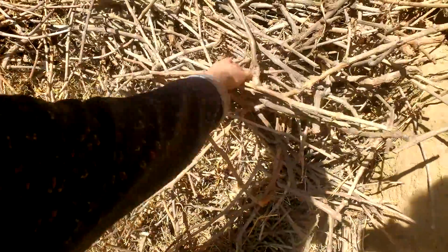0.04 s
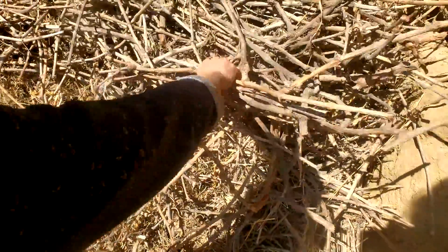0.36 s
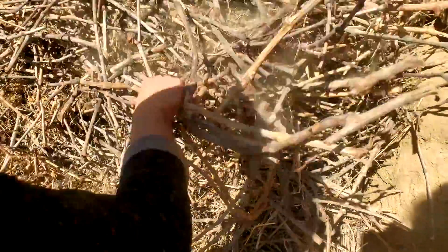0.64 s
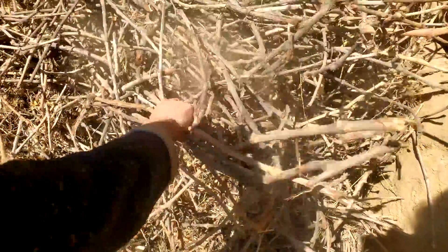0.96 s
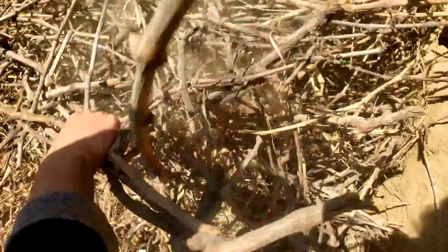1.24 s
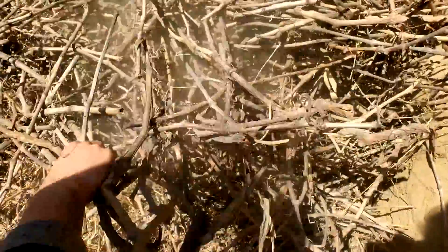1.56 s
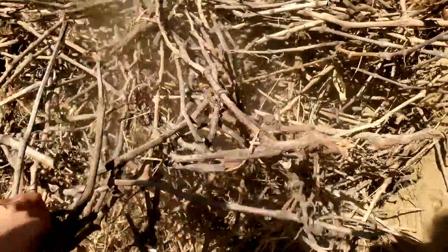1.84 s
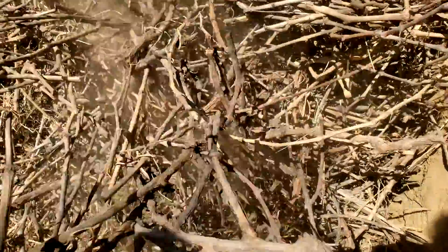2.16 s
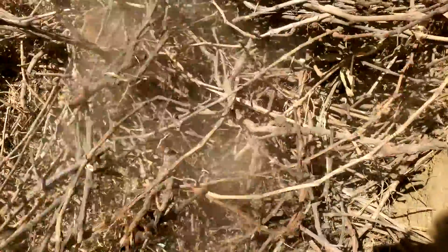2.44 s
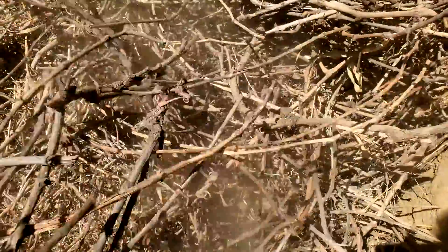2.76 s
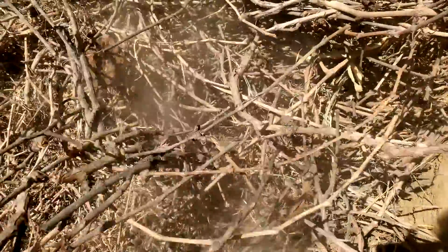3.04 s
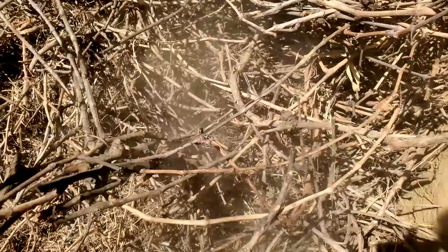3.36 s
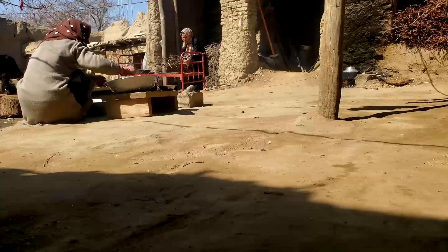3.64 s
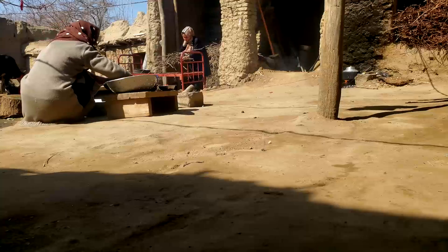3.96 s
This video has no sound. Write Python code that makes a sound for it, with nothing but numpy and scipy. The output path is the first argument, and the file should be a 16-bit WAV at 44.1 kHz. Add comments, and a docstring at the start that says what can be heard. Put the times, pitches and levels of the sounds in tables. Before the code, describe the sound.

Dry branches rustle and snap as they are pulled from a pile close by, slightly left. One clacks at 0.1 seconds, then four crackling pulls begin around 0.5, 1.1, 1.8 and 2.3 seconds, the last with a thick stick breaking loudly. Dull knocks on hollow wood come in runs further off. At about 3.5 seconds it cuts to a quiet yard with low rumble, faint buzz and one distant scrape.

```python
"""A walled yard, with a brush pile close by and a little left of the microphone.
A branch clacks in the hand, then dry branches are dragged out in four pulls: twigs rub and crackle,
sticks snap, and as the last pull begins a thick stick breaks loudly with a short woody ring. Meanwhile,
further off, hollow wood is pounded in runs of about four blows a second. Near the end the sound cuts
abruptly to a quieter yard: low rumble, faint hiss, a thin buzz on the right and one far scrape."""
import sys
import numpy as np
from scipy import signal
from scipy.fft import rfft, irfft
from scipy.io import wavfile

SR = 44100
rng = np.random.default_rng(int(sys.argv[2]) if len(sys.argv) > 2 else 0)


def generate_wav(signal):
    """Clip the signal to [-1, 1] and save it as 16-bit WAV at the path in sys.argv[1]."""
    frames = np.transpose(np.atleast_2d(signal))
    scaled = np.clip(frames, -1, 1) * 32767
    pcm = np.round(scaled).astype(np.int16)
    wavfile.write(sys.argv[1], SR, pcm)


N = 176400
T = np.arange(N) / SR
CUT_S, TOP_HZ = 3.555, 16000   # the sound cuts to a quieter yard; upper edge of the treble

# how strongly sleeves and feet move: t/s, level/dB
MOVEMENT = [(0, -62), (0.11, -48.5), (0.25, -72), (0.57, -62.5), (0.83, -69.5), (0.94, -57), (1.0, -64.5),
            (1.2, -56.5), (1.61, -72.5), (1.96, -53.5), (2.03, -49.5), (2.12, -50.5), (2.54, -53),
            (2.8, -55.5), (3.52, -54), (3.56, -72.5), (4, -70)]
# spectrum of fine dry twigs and bark: f/Hz, level/dB
TWIG_SPECTRUM = [(1060, -31.5), (1800, -0.5), (2040, -1), (3180, 2), (4130, 1), (5830, -9), (7500, -24),
                 (9840, -9.5), (12100, -5), (13900, -1.5), (15600, -13)]


def from_db(db):
    """Decibels to gain."""
    return 10 ** (np.asarray(db) / 20)


def rms_one(x):
    """Scale to unit rms."""
    return x / np.sqrt(np.mean(x ** 2) + 1e-20)


def pan(x, left_db):
    """Place a sound so that the left channel leads the right by left_db."""
    return x * from_db(left_db * np.array([[.5], [-.5]]))


def add(out, s, sound):
    """Mix a sound in at s seconds."""
    start = int(s * SR)
    out[..., start:start + sound.shape[-1]] += sound[..., :N - start]


def butter(x, hz, kind, order=2):
    """Causal low- or high-pass."""
    return signal.sosfilt(signal.butter(order, hz, kind, fs=SR, output="sos"), x + 1e-18)


def convolve(x, response):
    """Pass a signal through a response; channels x N."""
    return signal.fftconvolve(np.atleast_2d(x), np.atleast_2d(response), axes=1)[:, :N]


def colour(x, points, size=4096):
    """Causal (minimum-phase) filter through points of f/Hz, level/dB."""
    hz, db = np.transpose(points)
    grid_hz = np.maximum(np.arange(size // 2 + 1) * SR / size, 1)
    gain = from_db(np.interp(np.log(grid_hz), np.log(hz), db))
    cepstrum = irfft(np.log(gain))
    cepstrum[1:size // 2] *= 2
    cepstrum[size // 2 + 1:] = 0
    return convolve(x, irfft(np.exp(rfft(cepstrum))))


def drift(hz, hop=40):
    """Smooth random wandering with spread 1."""
    pole = np.exp(-2 * np.pi * hz * hop / SR)
    noise = rng.standard_normal(N // hop + 2002)
    slow = signal.lfilter([1], [1, -2 * pole, pole * pole], noise)[2000:]
    return np.interp(np.arange(N) / hop, np.arange(len(slow)), rms_one(slow))


def stereo_noise(spectrum, side_db):
    """Coloured noise of unit rms, with a common part and a part that differs between the channels."""
    mid, side = rng.standard_normal((2, N))
    return rms_one(colour(mid + from_db(side_db) * side * [[1], [-1]], spectrum))


def dying_noise(t60):
    """A dense cluster of resonances dying together; unit energy in each channel."""
    t = T[:SR // 2]
    tail = rng.standard_normal((2, len(t))) * from_db(-60 * t / t60)
    return tail / np.sqrt(np.sum(tail ** 2, axis=1, keepdims=True))


def struck(modes, scatter_db):
    """One blow on wood: its modes (f/Hz, level/dB, t60/s) die away, each from a scattered strength."""
    t = T[:SR // 8]
    return sum(from_db(db + scatter_db * rng.standard_normal() - 60 * t / t60)
               * np.sin(2 * np.pi * hz * t) for hz, db, t60 in modes)


def background(rumble_db=-57, follow=0.29, hiss_db=-68.5):
    """Low outdoor rumble, swelling a little with the movement, and faint, wide hiss."""
    # spectra of the yard's rumble and hiss: f/Hz, level/dB
    rumble_spectrum = [(33, -12), (55, 1), (100, 1.5), (125, -8), (175, -6.5), (260, -17), (1000, -57.5)]
    hiss_spectrum = [(450, 0), (900, -9), (1400, -4), (2800, -4.5), (4600, -11), (7600, -44), (10000, -23),
                     (13000, -14), (16000, -24)]
    moving_db = np.interp(T, *np.transpose(MOVEMENT))
    swell_db = follow * (moving_db - moving_db.mean())
    rumble = from_db(rumble_db + swell_db) * stereo_noise(rumble_spectrum, side_db=-17)
    return rumble + from_db(hiss_db) * stereo_noise(hiss_spectrum, side_db=-1.5)


def buzz(hz=214, level_db=-71):
    """After the cut, a steady pulse train is heard on the right: a hum with a thin whine."""
    # weighting of the harmonics: f/Hz, level/dB
    spectrum = [(430, -17), (650, 1), (1100, -0.5), (1600, -22), (9200, -36), (9750, 0), (10800, -8),
                (16000, -29)]
    pulses = sum(np.cos(2 * np.pi * k * hz * T) for k in range(1, TOP_HZ // hz))
    return from_db(level_db) * rms_one(colour(pulses, spectrum)) * (T > CUT_S) * np.array([[0], [1]])


def far_scrape(at_s=3.79, width_s=0.039, level_db=-63):
    """One faint brushing sound from across the yard."""
    # spectrum of the scrape: f/Hz, level/dB
    spectrum = [(1400, -5.5), (4500, -12.5), (6500, -38)]
    swell = np.exp(-((T - at_s) / width_s) ** 2)
    return from_db(level_db) * swell * stereo_noise(spectrum, side_db=-2)


def yard(x, wet_db, t60=0.34, build_s=0.0043, wall_hz=9100):
    """The direct sound plus its scatter from the walls and the ground."""
    build_up = 1 - np.exp(-T[:SR // 2] / build_s)
    scatter = butter(dying_noise(t60) * build_up, wall_hz, "low", order=1)
    return x + from_db(wet_db) * convolve(x, scatter)


def knocks(gain_db=-1.5):
    """Blunt blows on hollow wood, some way off; a softer blow is duller."""
    # the blows: t/s, level/dB, hardness as low-pass f/Hz
    blows = [(0.062, -38, 1330), (0.293, -41.5, 1270), (0.538, -42, 1000), (0.763, -42.5, 1000),
             (1.229, -34, 1020), (1.457, -38, 1210), (1.71, -35.5, 1300), (2.421, -40, 900),
             (2.659, -39.5, 1210), (2.926, -34, 1200), (3.198, -39, 900), (3.445, -36.5, 1880)]
    # modes of the hollow wood: f/Hz, level/dB, t60/s
    modes = [(372, -3, 0.036), (554, 2, 0.037), (592, -5, 0.032), (900, -4, 0.025), (1150, 6.5, 0.015),
             (1790, 0, 0.013)]
    out = np.zeros(N)
    for s, db, top_hz in blows:
        add(out, s, from_db(db + gain_db) * butter(struck(modes, scatter_db=2), top_hz, "low"))
    return pan(butter(out, 380, "high"), left_db=5)


def shuffle(gain_db=-2, uneven_db=1.5):
    """Soft, uneven low rubbing of clothes and feet."""
    # spectrum of the rubbing: f/Hz, level/dB
    spectrum = [(60, -23.5), (130, -4), (190, 0), (280, -4), (400, -13), (900, -52.5)]
    level_db = np.interp(T, *np.transpose(MOVEMENT)) + gain_db + uneven_db * drift(hz=25)
    return from_db(level_db) * stereo_noise(spectrum, side_db=-17.5)


def clacks():
    """Close to the microphone, the gripped branch clacks against its neighbour and rebounds."""
    # the hit and its rebound: t/s, level/dB
    hits = [(0.1254, -22.5), (0.1424, -42)]
    # damped modes of the branch: f/Hz, level/dB, t60/s
    modes = [(480, -7, 0.02), (990, 6, 0.0041), (1910, -5, 0.0098), (3200, -10, 0.0042), (4870, -16, 0.011)]
    out = np.zeros(N)
    for s, db in hits:
        add(out, s, from_db(db) * struck(modes, scatter_db=5))
    dulled = butter(out, 4300, "low", order=4)
    return pan(butter(dulled, 300, "high"), left_db=7.5)


def to_the_left(x):
    """The right channel is shaded from the pile, most of all in the high treble."""
    # balance at the microphone: f/Hz, left minus right level/dB
    balance = [(450, 1.5), (740, 9.5), (1220, 1.5), (2010, 4), (3330, 9), (11500, 7.5), (15000, 28)]
    hz, lead_db = np.transpose(balance)
    left_db = 10 * np.log10(2 / (1 + from_db(-lead_db) ** 2))   # keeps the total power
    return np.vstack([colour(x[0], np.c_[hz, left_db]), colour(x[1], np.c_[hz, left_db - lead_db])])


def clinks(pull_db, per_s=45, level_db=-34, follow=0.92, scatter_db=3, low_hz=1127, high_hz=4503):
    """Loose twigs tap together, each with a brief pitch of its own, louder in a harder pull."""
    out = np.zeros((2, N))
    tap_db = level_db + follow * (pull_db - pull_db.max())
    for when, pitch, size, side in rng.random((int(per_s * N / SR), 4)):
        db = tap_db[int(when * N)] + scatter_db * (2 * size - 1)
        hz = low_hz + pitch * (high_hz - low_hz)
        tap = struck([(hz, db, 0.03)], scatter_db=0.5)
        add(out, when * N / SR, pan(tap, left_db=6 * (side - .5)))
    return out


def twig_response(ring_s, ring_db):
    """One twig: a sharp tick, later on the right, and a short woody ring of its own."""
    response = from_db(ring_db) * dying_noise(ring_s)[:, :SR // 8]
    response[0, 0] += 1
    response[1, rng.integers(4, 12)] += 1
    return response


def crackle(pull_db, per_s, spread_db, clump_db, ring_s, ring_db, follow, twigs=8):
    """Stick-slip clicks dealt to several twigs; they swell in clumps and thicken as the pull grows."""
    rate = per_s * from_db(follow * (pull_db - pull_db.max()))
    sizes = from_db(spread_db * np.minimum(rng.exponential(1, N), 4)) * rng.choice([-1, 1], N)
    slips = rng.random(N) < rate / SR
    clumps = from_db(clump_db * drift(hz=34))
    clicks = sizes * slips / np.sqrt(rate) * clumps   # equal power at any rate
    dealt = rng.integers(0, twigs, N)
    return sum(convolve(clicks * (dealt == k), twig_response(ring_s, ring_db)) for k in range(twigs))


def bark_ticks(pull_db, level_db=-52, follow=0.43):
    """Brittle bark ticks sparsely; it follows the drag only in part, so it goes on between pulls."""
    ticks = crackle(pull_db, per_s=95, spread_db=1, clump_db=7, ring_s=0.084, ring_db=6, follow=0.25)
    swell_db = follow * (pull_db - pull_db.max())
    return from_db(level_db + swell_db) * rms_one(colour(ticks, TWIG_SPECTRUM))


def thick_break(at_s=2.2503, hz=880, level_db=-31.5, t60=0.048):
    """The short woody ring of a thick stick as it breaks."""
    out = np.zeros((2, N))
    add(out, at_s, struck([(hz, level_db, t60)], scatter_db=3))
    return out


def snaps(gain_db=5, splinter_db=2, splinter_s=0.0076, splinters_per_s=5000, wood_hz=1400):
    """A snap is a crack, a dying run of splintering fibres and a ring; thick sticks splinter longer."""
    # sticks that break: t/s, level/dB, thickness as low wood tone level/dB
    breaks = [(0.126, -34.5, -10), (0.558, -22, 1.5), (0.6072, -30, -2), (0.633, -27.5, -2),
              (0.7274, -32.5, -6), (1.0566, -23.5, -24), (1.0645, -23, -21), (1.0674, -16, -12),
              (1.089, -24, -7), (1.1592, -25.5, -2), (1.229, -15.5, -13), (1.236, -25, -2),
              (1.3219, -29, -5), (1.5545, -30.5, 1), (1.803, -19, -29), (1.838, -19, -25),
              (1.861, -20.5, -10), (1.91, -17.5, -13), (1.947, -17, -13), (1.989, -19, 3.5),
              (2.092, -27, 4), (2.2292, -18, -15), (2.25, -17, 8), (2.263, -23, 1), (2.317, -21.5, -14),
              (2.3835, -19, -18), (2.5326, -27.5, -17), (2.604, -27, 0), (2.679, -32.5, 9.5),
              (2.702, -31.5, -20), (2.7563, -26.5, -5), (2.778, -24, -6), (2.8309, -21.5, -12),
              (2.845, -32, 0), (2.9238, -14, -1.5), (2.979, -26, -12), (3.0157, -21.5, -11),
              (3.139, -31, -16), (3.287, -29, -9), (3.3452, -26, -9), (3.359, -27, -12), (3.449, -27, 9.5)]
    # spectrum of snapping wood: f/Hz, level/dB
    spectrum = [(180, -15), (320, -6), (550, 4.5), (800, -4), (1300, 5), (3000, 7.5), (4500, 4),
                (6000, -2.5), (7500, -15.5), (9500, -5.5), (12500, 2.5), (16000, -8.5)]
    out, t = np.zeros((2, N)), T[:SR // 8]
    for s, db, wood_db in breaks:
        thickness = from_db(wood_db)
        fibres = (rng.random(len(t)) < splinters_per_s / SR) * rng.standard_normal(len(t))
        fibres *= np.exp(-t / (splinter_s * thickness))
        fibres *= from_db(splinter_db) / (np.linalg.norm(fibres) + 1e-18)
        fibres[0] = 1   # the first crack
        crack = convolve(fibres, twig_response(ring_s=0.041, ring_db=0.5))
        crack += (thickness - 1) * butter(crack, wood_hz, "low", order=1)   # low shelf
        add(out, s, from_db(db + gain_db) * crack)
    return colour(out, spectrum)


def rustle(pull_db, twig_db=4, stick_db=-0.5, split_hz=1760):
    """Under each pull fine twigs crackle in the treble; lower down, sticks scrape over each other."""
    # spectrum of the thicker sticks: f/Hz, level/dB
    stick_spectrum = [(150, -24), (300, -5.5), (520, -5), (950, -4.5), (1300, 0.5), (1700, -2), (2300, 1)]
    twigs = crackle(pull_db, per_s=3500, spread_db=3.5, clump_db=0.47,
                    ring_s=0.031, ring_db=5, follow=0.45)
    sticks = crackle(pull_db, per_s=1500, spread_db=3, clump_db=1.14,
                     ring_s=0.027, ring_db=2.5, follow=0.4)
    twigs = rms_one(butter(colour(twigs, TWIG_SPECTRUM), split_hz, "high", order=4))
    sticks = rms_one(butter(colour(sticks, stick_spectrum), split_hz, "low", order=4))
    return from_db(pull_db + twig_db) * twigs + from_db(pull_db + stick_db) * sticks


def scene(fade_s=0.016):
    """The near pile and the further knocks, until the sound cuts abruptly to a quieter yard."""
    # how hard the branches drag, one list per pull: t/s, level/dB
    pulls = [
        [(0, -80), (0.27, -67), (0.41, -61), (0.54, -48.5), (0.57, -44), (0.64, -44), (0.7, -59), (0.86, -58.5),
         (0.97, -70), (1.04, -66.5)],
        [(1.06, -50.5), (1.11, -48.5), (1.15, -41), (1.2, -44), (1.25, -43.5), (1.38, -50.5), (1.43, -60),
         (1.72, -62.5)],
        [(1.78, -46), (1.83, -50), (1.88, -42), (2.0, -40), (2.04, -45), (2.22, -56)],
        [(2.26, -39), (2.3, -45), (2.35, -41.5), (2.48, -51.5), (2.59, -51.5), (2.65, -54.5), (2.81, -51.5),
         (2.85, -42.5), (2.88, -51.5), (2.98, -49.5), (3.07, -50), (3.17, -58.5), (3.22, -54), (3.27, -60.5),
         (3.4, -58.5), (3.47, -59.5), (3.54, -60.5)],
    ]
    pull_db = np.interp(T, *np.vstack(pulls).T)
    ambience = shuffle() + far_scrape() + background() + buzz()
    blows = yard(clacks(), wet_db=-15.5) + yard(knocks(), wet_db=1.5)
    pile = rustle(pull_db) + bark_ticks(pull_db) + snaps() + thick_break() + clinks(pull_db)
    pile = to_the_left(yard(pile, wet_db=-10))
    before_cut = np.clip((CUT_S - T) / fade_s, 0, 1)
    return before_cut * (pile + blows) + ambience


def record(dry):
    """The top is cut steeply."""
    return signal.sosfilt(signal.ellip(10, .1, 80, TOP_HZ, fs=SR, output="sos"), dry)


dry = scene()
out = record(dry)
generate_wav(out)
```